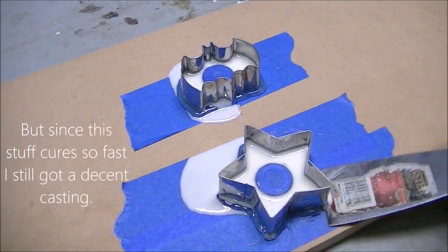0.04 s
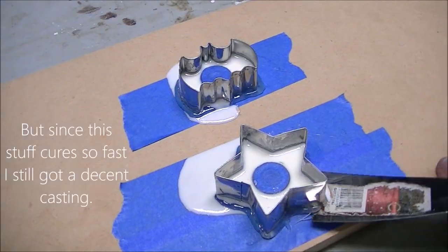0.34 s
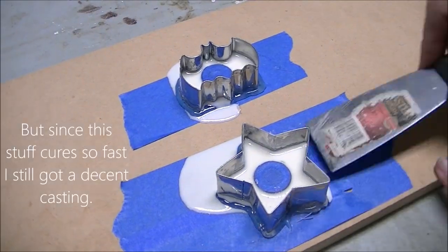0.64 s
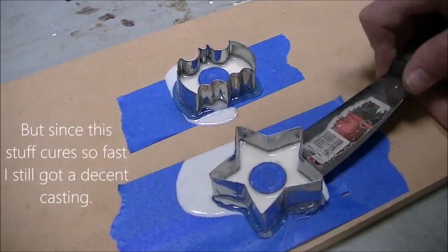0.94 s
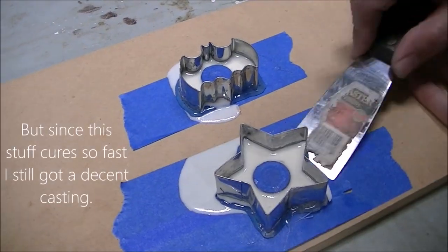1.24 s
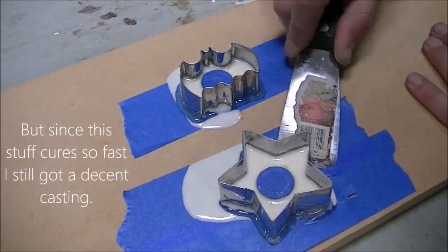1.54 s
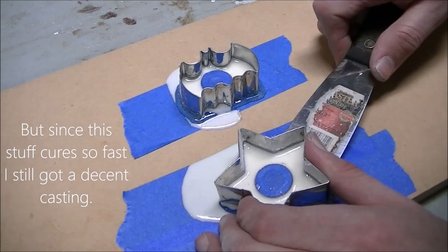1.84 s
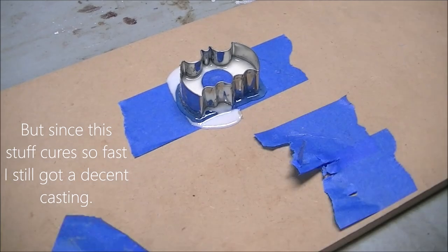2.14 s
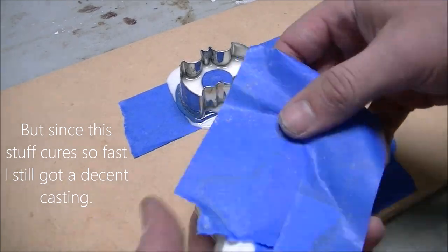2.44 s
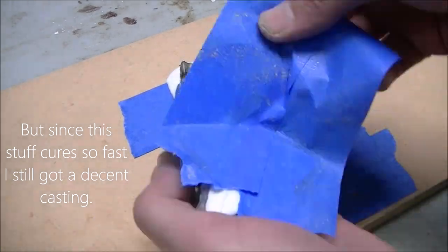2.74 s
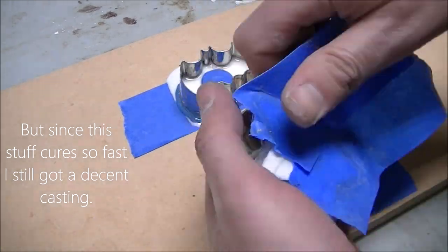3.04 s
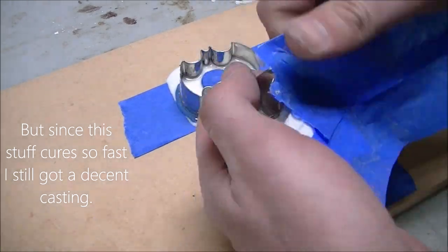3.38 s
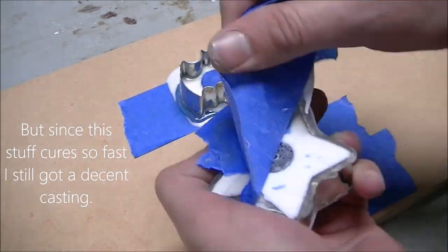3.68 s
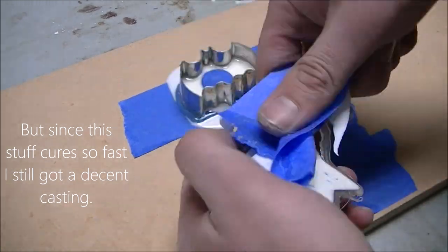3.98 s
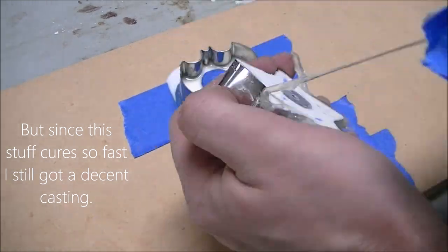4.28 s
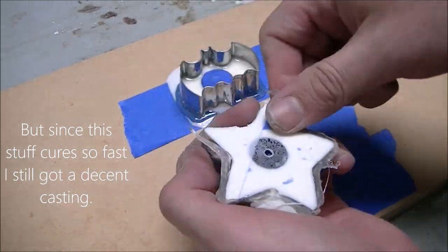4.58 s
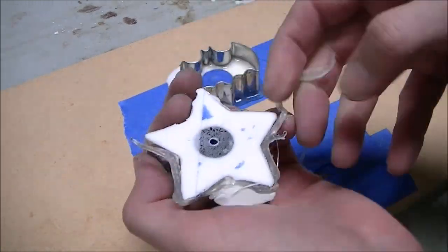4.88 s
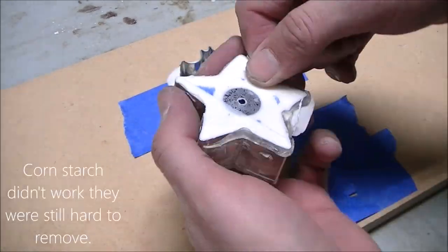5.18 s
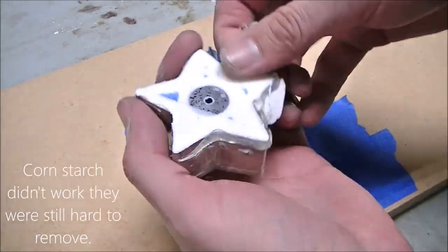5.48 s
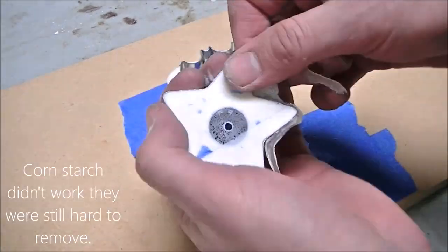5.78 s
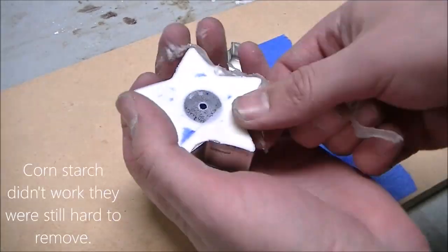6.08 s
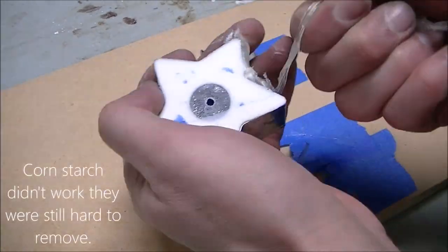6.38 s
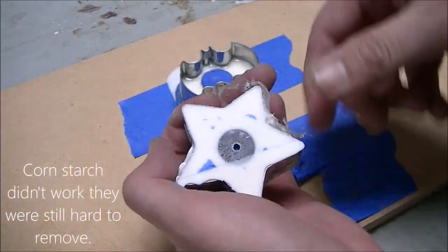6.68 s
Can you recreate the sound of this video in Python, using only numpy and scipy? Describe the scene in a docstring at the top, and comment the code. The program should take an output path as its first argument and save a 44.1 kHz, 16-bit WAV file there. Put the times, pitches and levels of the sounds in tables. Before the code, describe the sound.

Sharp little cracks and metallic clicks of prying on a board, a loud knife clatter, then short tape rips over a faint camera whine.

```python
"""Over the still air of a small workshop and a close camera's whine, a putty knife levers a metal star
mould off a taped board: strained glue crackles, jolts ring blade and board, and each fracture is a tiny,
sharp crack. Just after 2 s the mould comes free and the knife clatters down, overloading the camera.
Masking tape is peeled off in short rips while the lens motor runs up once. From 4.6 s the crackle
thins and the last brittle strings of resin are snapped away."""
import sys
import numpy as np
from scipy import signal
from scipy.fft import rfft, irfft
from scipy.io import wavfile
from scipy.ndimage import uniform_filter1d

SR = 44100
rng = np.random.default_rng(int(sys.argv[2]) if len(sys.argv) > 2 else 0)


def wav_out(sig):
    """Save sig, one row per channel (or a flat mono array), as 16-bit PCM at SR to the path in sys.argv[1]."""
    wavfile.write(sys.argv[1], SR, np.round(np.clip(np.atleast_2d(sig).T, -1, 1) * 32767).astype(np.int16))


N = 300762
TIME = np.arange(N) / SR

# single fractures of resin and tape glue:
# (time [s], snap over 1 ms [dB], snap centre [Hz], push on the sheet behind it [dB])
FRACTURES = [(0.1904, -12, 8200, -31), (0.3276, -16, 11100, -28), (0.3734, -22, 11300, -30),
             (0.3801, -8.5, 8600, -22), (0.4688, -16, 9200, -29), (0.5296, -17, 8400, -34),
             (0.553, -8, 6900, -18), (0.8993, -20.5, 7150, -41), (0.9806, -21, 10700, -40),
             (0.9932, -21, 8700, -29), (0.9973, -8.5, 8450, -36), (1.0365, -14.5, 7950, -27.5),
             (1.07, -12.5, 9900, -35), (1.0755, -11.5, 9800, -21.5), (1.11, -19.5, 12000, -26),
             (1.1722, -22, 7500, -29), (1.1871, -8.5, 11400, -33), (1.1993, -15.5, 9800, -26),
             (1.4894, -25, 10700, -58), (1.5048, -18, 8900, -35), (1.5577, -24.5, 10600, -25),
             (1.6163, -10.5, 8900, -25), (1.6353, -6, 9400, -28), (1.995, -18, 8100, -32),
             (2.0137, -7, 9000, -27), (2.028, -9, 7300, -24), (2.049, -12, 8700, -27),
             (2.1448, -14.5, 8700, -46), (2.4081, -22.5, 5500, -26.5), (2.551, -9, 5100, -16.5),
             (2.5861, -6, 8100, -23.5), (2.6327, -17, 8500, -34), (2.7379, -11.5, 4400, -28),
             (2.767, -9.5, 7000, -28.5), (2.771, -5.5, 8050, -22), (2.823, -7, 9500, -13.5),
             (3.0227, -23.5, 7600, -33), (3.0792, -28, 7000, -25), (3.2868, -11.5, 10600, -43),
             (3.316, -20.5, 5200, -27.5), (3.3918, -26.5, 6800, -27.5), (3.442, -14, 8500, -23.5),
             (3.4772, -12, 8500, -33), (3.6155, -9, 9700, -24.5), (3.8039, -8.5, 10600, -23),
             (3.8082, -15, 7400, -28), (3.85, -14, 8250, -32), (3.888, -11, 7400, -18.5),
             (3.922, -18, 9100, -34), (3.975, -14, 10500, -30.5), (4.028, -21, 9600, -30.5),
             (4.104, -7.5, 9500, -24), (4.1124, -9.5, 9400, -19), (4.1851, -19, 7750, -35),
             (4.194, -18, 11500, -50), (4.2605, -14, 8100, -25), (4.3344, -21.5, 11000, -38),
             (4.3439, -12, 10600, -19), (4.3612, -21, 9100, -51), (4.5569, -30, 3000, -19),
             (4.8322, -14, 7600, -35.5), (5.0846, -22.5, 11100, -60), (5.3684, -16, 7500, -27),
             (5.62, -14.5, 8400, -24.5), (5.9652, -21.5, 9550, -29), (5.981, -26, 4000, -18.5),
             (6.244, -33, 8000, -30.5), (6.3389, -16, 9700, -30), (6.4947, -20, 8800, -32),
             (6.6167, -21.5, 9800, -35)]


def undb(db):
    """Decibels to gain."""
    return 10 ** (np.asarray(db) / 20)


def unit(x):
    """Scaled to rms 1."""
    return x / np.sqrt(np.mean(x ** 2) + 1e-20)


def add(out, s, x):
    """Mix x in at s seconds."""
    i = max(int(s * SR), 0)
    out[i:i + len(x)] += x[:N - i]


def band(x, lo_hz, hi_hz, order=2):
    """Causal band-pass."""
    sos = signal.butter(order, [lo_hz, min(hi_hz, .48 * SR)], "band", fs=SR, output="sos")
    return signal.sosfilt(sos, x)


def resonate(x, hz, q):
    """One resonance, gain 1 at its centre."""
    w = 2 * np.pi * min(hz, .42 * SR) / SR
    a = np.sin(w) / (2 * q)
    return signal.lfilter([a, 0, -a], [1 + a, -2 * np.cos(w), 1 - a], x)


def fade(t, t60):
    """Exponential decay, 60 dB down after t60 seconds."""
    return np.exp(-np.log(1000) * t / t60)


def top_cut(x, edge_hz=16050):
    """Steep low-pass on the highest treble."""
    return signal.sosfilt(signal.ellip(10, .1, 75, edge_hz, fs=SR, output="sos"), x)


def drift(per_s):
    """Smooth random wander with a spread near 1."""
    hold = int(SR / per_s)
    steps = np.repeat(rng.standard_normal(N // hold + 1), hold)
    return 1.48 * uniform_filter1d(steps, hold)[:N]


def grains(size, per_s, spread_db):
    """Random tiny slips with widely scattered strengths."""
    strength = undb(spread_db * np.minimum(rng.exponential(size=size), 4))
    return (rng.random(size) < per_s / SR) * strength * rng.standard_normal(size)


def air(level_db=-53.2):
    """An even bed of room tone and microphone hiss."""
    # still air of the shop: (frequency [Hz], relative density [dB])
    spectrum = [(40, -32), (120, -31), (180, -14), (280, -4), (450, 0), (750, -4.5), (1500, -6.5),
                (2900, -6), (4500, -13.5), (8000, -15), (15000, -20)]
    hz, db = np.transpose(spectrum)
    bins_hz = np.maximum(np.fft.rfftfreq(N, 1 / SR), 1)
    colour = undb(np.interp(np.log(bins_hz), np.log(hz), db))
    return undb(level_db) * unit(irfft(rfft(rng.standard_normal(N)) * colour, N))


def camera(waver=.0013):
    """A steady motor whine that wavers a little, and one short rising run of the lens motor."""
    # partials of the camera motor: (frequency [Hz], level [dB])
    motor_partials = [(479.1, -63), (958.2, -59), (1437, -57), (1922, -60), (2401, -67), (2880, -61),
                      (3359, -72), (6239, -70)]
    # lens motor running up: (time [s], pitch [Hz], level [dB])
    lens_run = [(2.7, 495, -57), (2.9, 525, -56), (3.1, 555, -53), (3.32, 573, -57), (3.45, 598, -62)]
    motor_time = np.cumsum(1 + waver * drift(9.8)) / SR
    whine = sum(undb(db + drift(12)) * np.sin(2 * np.pi * hz * motor_time) for hz, db in motor_partials)
    s, hz, db = np.transpose(lens_run)
    lens_gain = undb(np.interp(TIME, s, db, left=-np.inf, right=-np.inf))
    lens = lens_gain * np.sin(2 * np.pi * np.cumsum(np.interp(TIME, s, hz)) / SR)
    return np.sqrt(2) * (whine + lens)


def strain(attack_s=0.045, release_t60=0.34, handling_db=-58, tape_off_s=4.6, idle_db=-66):
    """Crackle envelope: each pull builds, holds and dies, over light handling until the tape is off."""
    # pushes of the knife and pulls on the tape: (start [s], length [s], level [dB])
    pulls = [(0.517, 0.093, -40), (.77, 0.039, -46.5), (0.918, 0.28, -42), (1.534, .04, -42),
             (1.619, .06, -38.5), (1.914, .06, -43), (2.006, 0.023, -33), (2.112, 0.053, -37),
             (2.18, 0.097, -29), (2.393, 0.2, -46), (2.549, 0.092, -40.5), (2.745, 0.066, -35.5),
             (2.914, 0.046, -45), (3.085, 0.048, -37), (3.273, 0.068, -37.5), (3.437, 0.05, -41),
             (3.622, 0.088, -23.5), (3.795, 0.1, -40), (4.01, 0.058, -39), (4.182, .09, -48),
             (4.34, 0.18, -45.5)]
    power = undb(2 * np.where(TIME < tape_off_s, handling_db, idle_db))
    for start, length, db in pulls:
        attack = np.clip(1 + (TIME - start) / attack_s, 0, 1) ** 2
        release = fade(np.clip(TIME - start - length, 0, 1), release_t60)
        power += (undb(db) * attack * release) ** 2
    return np.sqrt(power)


def crackle(trim_db=-1, sheet_db=-16, patchy_db=3, creak_db=-26, ticks_db=-6, rub_db=-6):
    """Glue threads let go under strain, flaring around each fracture; tape and board rustle along."""
    pull = undb(trim_db) * strain()
    creak_power, lead_s = np.zeros(N), .0035
    creak_shape = np.hanning(int(2 * lead_s * SR))
    for s, snap_db, _, _ in FRACTURES:
        add(creak_power, s - lead_s, undb(2 * (snap_db + creak_db)) * creak_shape)
    slips = grains(N, per_s=2400, spread_db=4) * undb(2.5 * drift(70))
    treble = band(slips, 2600, 12400)
    # each fold of tape has its own colour, so the bands come and go separately
    glue = unit(sum(undb(patchy_db * drift(35)) * resonate(treble, hz, q=1.8)
                    for hz in (3950, 6300, 11700, 13900)))
    sheet = unit(band(slips, 500, 1130))
    tearing = np.sqrt(pull ** 2 + creak_power) * (glue + undb(sheet_db) * sheet)
    # whole creases flip over, ticking faintly even between pulls
    creases = band(grains(N, per_s=70, spread_db=3), 3000, 17000)
    ticks = np.maximum(pull, undb(-57)) * unit(resonate(creases, 9000, q=1.5))
    # the blade's drag shakes the board, and mostly goes as the blade lifts around 2 s
    pressed = np.interp(TIME, (1.9, 2.13), (1, 0.13))
    rub = pressed * pull * unit(sum(resonate(slips, hz, q=10.6) for hz in (460, 860, 1180)))
    return tearing + undb(ticks_db) * ticks + undb(rub_db) * rub


def knocks(modes_db=-1, wood_db=-5, steel_db=-3, metal_t60=0.13, thud_db=-19, thud_growth=0.77):
    """A jolt rings the board and the hand-damped steel of blade and mould; the bench thuds below."""
    # jolts of knife and mould: (time [s], board [dB], metal ring [dB], ring centre [Hz])
    jolts = [(0.034, -47, -44.5, 6740), (0.191, -41.5, -35.5, 7900), (0.328, -46.5, -40.5, 8400),
             (0.381, -36, -26, 8150), (0.469, -50, -38.5, 9400), (0.549, -38, -24.5, 9200),
             (0.895, -45, -38, 7200), (0.994, -41.5, -32.5, 9000), (1.071, -44.5, -38, 9100),
             (1.11, -47, -51, 11000), (1.187, -34.5, -37.5, 10400), (1.558, -38.5, -41, 6400),
             (1.636, -34, -26, 9900), (2.014, -30, -23.5, 9700), (2.214, -27.5, -20, 5530),
             (2.272, -10.5, -35, 5350), (2.285, -11.5, -19, 4300), (2.815, -37.5, -36, 8300),
             (3.746, -60, -24.5, 7600), (4.114, -47, -30.5, 9100), (4.365, -51, -43, 9000),
             (4.557, -40, -35, 2950), (5.981, -32, -37, 3820), (6.616, -43, -35.5, 7800)]
    # modes of the board with the knife on it: (frequency [Hz], level [dB])
    board_modes = [(757, -12.5), (829, -7), (893, -5), (958, 0), (1055, -6.5), (1184, -2), (1300, 0.5),
                   (1383, -5.5), (1494, -3.5), (1682, -3), (1745, -2), (1888, -6.5), (2009, 3), (2126, -9),
                   (2193, -36), (2568, -1), (2869, -1.5), (3101, 1), (3596, 3)]

    def struck(x):
        """Scaled to rms 1 over the body of the hit, 3 to 20 ms in."""
        return x / np.sqrt(np.mean(x[130:880] ** 2))

    t = np.arange(SR // 4) / SR
    hz, db = np.transpose(board_modes)[:, :, None]
    mode_t60 = 0.16 * (1000 / hz) ** 1.2
    board = undb(db) * fade(t, mode_t60) * np.exp(2j * np.pi * hz * t)
    # the same crowd of steel partials answers every jolt, in a new mix
    steel_hz = np.exp(rng.uniform(np.log(2500), np.log(15800), size=120))
    steel = np.exp(2j * np.pi * steel_hz[:, None] * t)
    out = np.zeros(N)
    for s, board_db, ring_db, ring_hz in jolts:
        noise = rng.standard_normal((4, len(t)))
        mode_phases = np.exp(2j * np.pi * rng.random(len(board)))
        modes = struck((mode_phases @ board).imag)
        wood_wash = struck(band(noise[0], 830, 2300, order=3) * fade(t, t60=.125))
        body = undb(modes_db) * modes + undb(wood_db) * wood_wash
        thud = struck(band(noise[1], 414, 569) * fade(t, t60=0.14))
        steel_mix = noise[2, :len(steel)] * np.exp(2j * np.pi * rng.random(len(steel)))
        partials = unit((steel_mix @ steel).imag)
        # crumbs of resin chatter against the steel and roughen its ring
        grit = unit(noise[3] + grains(len(t), per_s=2000, spread_db=6.3))
        # a softer contact leaves the top of the ring out
        ring = band(undb(steel_db) * partials + grit, 1970, 1.62 * ring_hz, order=3)
        metal = struck(resonate(ring, ring_hz, q=0.22) * fade(t, metal_t60))
        add(out, s, undb(board_db) * body + undb(ring_db) * metal)
        add(out, s, undb(thud_db + thud_growth * board_db) * thud)
    return out


def bumps():
    """Fingers nudge the mould: a dull knock with no ring."""
    # soft bumps of the hands: (time [s], level [dB])
    nudges = [(0.112, -45.5), (4.365, -37), (6.515, -34)]
    t = np.arange(SR // 4) / SR
    out = np.zeros(N)
    for s, db in nudges:
        dull_noise = unit(band(rng.standard_normal(len(t)), 350, 1500))
        add(out, s, undb(db) * dull_noise * fade(t, t60=0.18))
    return out


def cracks(snap_t60=0.0031, push_t60=0.0069, chip_share=0.18, thump_db=-21, thump_growth=2.13):
    """Each fracture is a ragged burst that rings the chip it frees and flicks the sheet behind it."""
    t = np.arange(1024) / SR
    into_one_ms = np.sqrt(SR / (1000 * len(t)))  # gives a burst the energy of 1 ms at its level
    noise = rng.standard_normal((128, 2, len(t)))
    bursts = top_cut(band(noise[:, 0] * fade(t, snap_t60), 2700, 20000, order=3))
    pushes = band(noise[:, 1] * fade(t, push_t60), 626, 3240)
    thump = unit(band(fade(t, t60=.008), 25, 450, order=1))
    out = np.zeros(N)
    for (s, db, hz, push_db), burst, push in zip(list(FRACTURES) + rips(), bursts, pushes):
        colour = unit(resonate(burst, hz, q=1.0))
        chip = unit(resonate(burst, hz, q=3.4))
        snap = unit(unit(burst) + colour + chip_share * chip)
        # the loudest snaps overload the camera's input, leaving a faint low thump
        overload = undb(thump_db + thump_growth * db) * thump
        add(out, s, into_one_ms * (undb(db) * snap + overload + undb(push_db) * unit(push)))
    return out


def slides():
    """A rasp of dense stick-slip that swells and dies within a few hundredths of a second."""
    # short slides of blade and tape: (start [s], length [s], level [dB], centre [Hz])
    strokes = [(0.536, 0.043, -18, 8450), (1.26, .042, -38, 9200), (2.006, 0.026, -14, 9600),
               (2.255, 0.017, -19, 5130), (2.266, 0.05, -25.5, 9200), (3.082, 0.017, -28, 11500),
               (3.193, 0.039, -38, 8650), (3.43, 0.02, -26, 8000), (3.474, 0.015, -29.5, 9500),
               (3.741, 0.019, -11, 6200), (3.959, 0.024, -31.5, 9500), (4.108, 0.013, -13.5, 9900),
               (4.405, 0.025, -35.5, 13600), (6.166, 0.023, -42.5, 10200), (6.635, 0.031, -45, 10300)]
    out = np.zeros(N)
    for s, length, db, hz in strokes:
        size = int(length * SR)
        slips = band(grains(size, per_s=7000, spread_db=3), .4 * hz, 17000)
        rasp = resonate(slips, hz, q=0.46)
        add(out, s, undb(db) * unit(rasp * signal.windows.tukey(size, .7)))
    return out


def rips(per_s=95, jitter=0.3, scatter_db=2, push_db=-20):
    """A stretch of glue gives way in a quick, uneven run of fractures: rows like those of FRACTURES."""
    # stretches of glue letting go: (start [s], length [s], typical snap [dB], centre [Hz])
    stretches = [(2.189, .06, -15, 6700), (2.801, .02, -12.5, 5770), (3.633, .115, -8.5, 7800),
                 (4.395, 0.026, -25, 12100), (4.483, .035, -33, 7000)]
    rows = []
    for start, length, db, hz in stretches:
        gaps, snaps, pushes = rng.standard_normal((32, 3)).T
        delays = np.append(0, np.cumsum(np.exp(jitter * gaps)) / per_s)
        rows += [(start + delay, db + scatter_db * snap, hz, db + push_db + scatter_db * push)
                 for delay, snap, push in zip(delays, snaps, pushes) if delay < length]
    return rows


def workshop(x, tail_db=-12, early_db=-19, lifted_db=-5):
    """Bench and hands throw back early echoes; the small room adds a short tail."""
    t = np.arange(SR // 2) / SR
    noise = rng.standard_normal((3, len(t)))
    low_tail = band(noise[0], 290, 3600) * fade(t, t60=0.22)
    high_tail = band(noise[1], 8400, 21700) * fade(t, t60=0.11)
    tail = (low_tail + high_tail) * np.minimum(t / 0.003, 1)
    early = band(noise[2], 680, 10300) * fade(t, t60=0.048) * (t > .0015)
    response = (undb(tail_db) * unit(tail) + undb(early_db) * unit(early)) / np.sqrt(len(t))
    # the hands lift the mould off the board toward the microphone, so it sounds drier
    send = undb(np.interp(TIME, [2.3, 4.7], [0, lifted_db]))
    return x + signal.fftconvolve(x * send, response)[:N]


def scene():
    """All the handwork in the room, over camera whine and room tone, in mono."""
    handwork = cracks() + knocks() + bumps() + slides() + crackle()
    return (workshop(handwork) + camera() + air())[None]


def record(dry):
    """The camera's input stage rounds off peaks near full scale; the top is cut."""
    return top_cut(dry / (1 + dry ** 4) ** (1 / 4))


dry = scene()
out = record(dry)
wav_out(out)
```